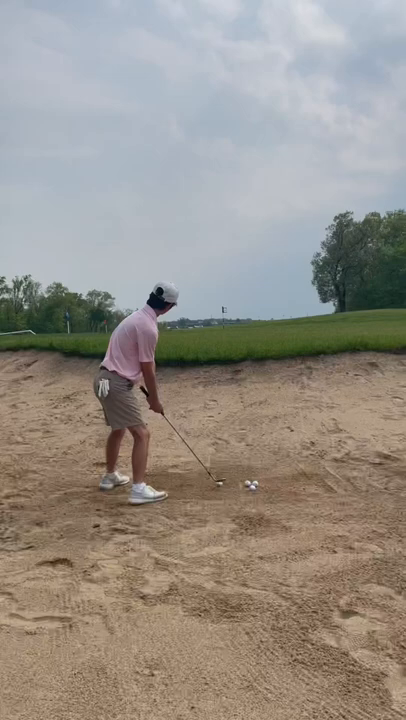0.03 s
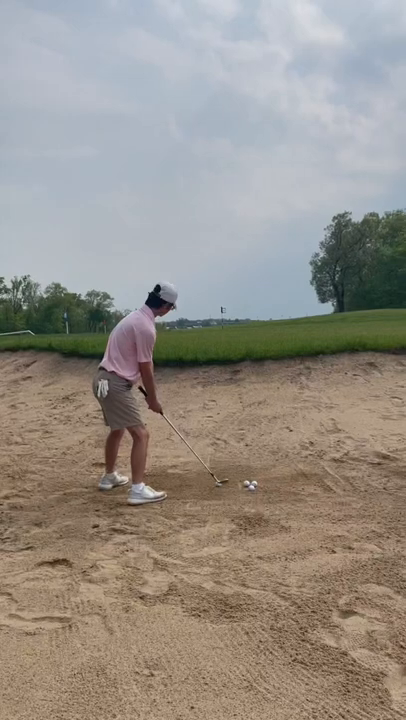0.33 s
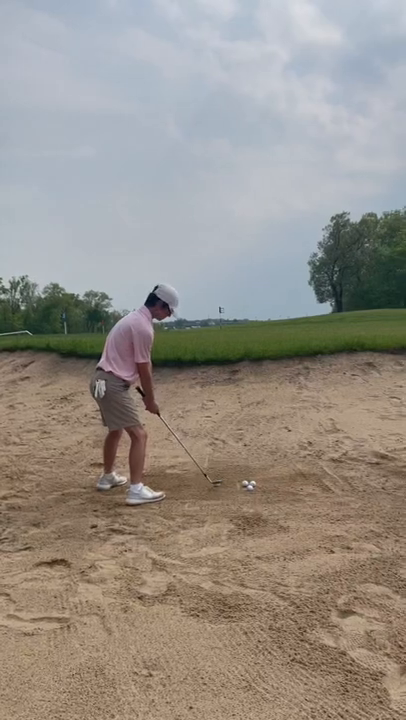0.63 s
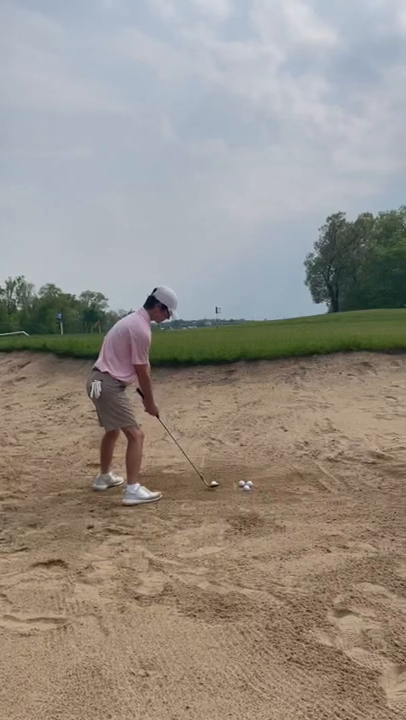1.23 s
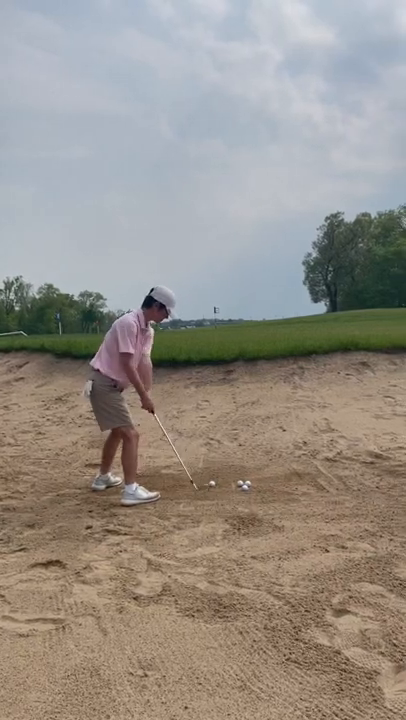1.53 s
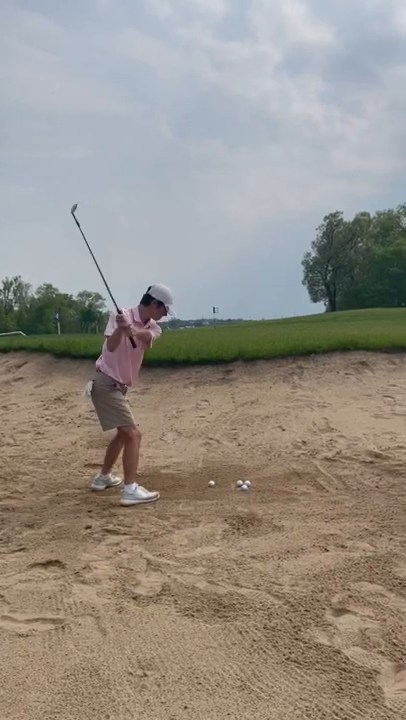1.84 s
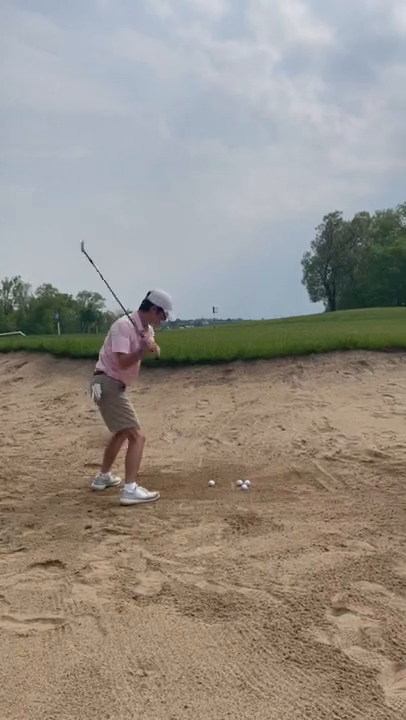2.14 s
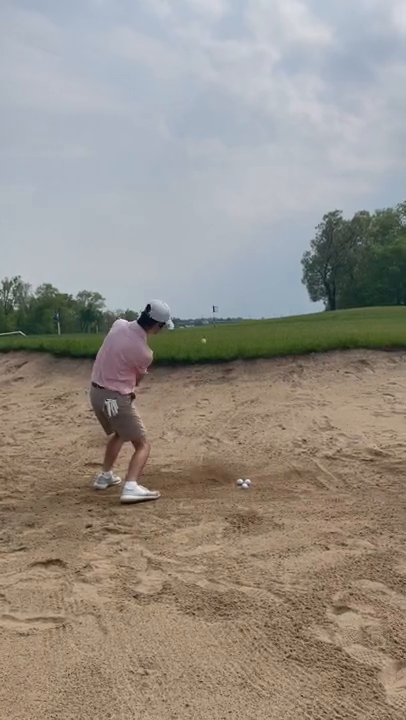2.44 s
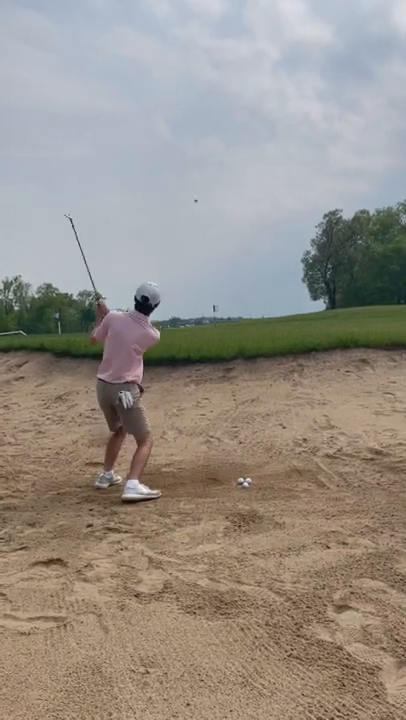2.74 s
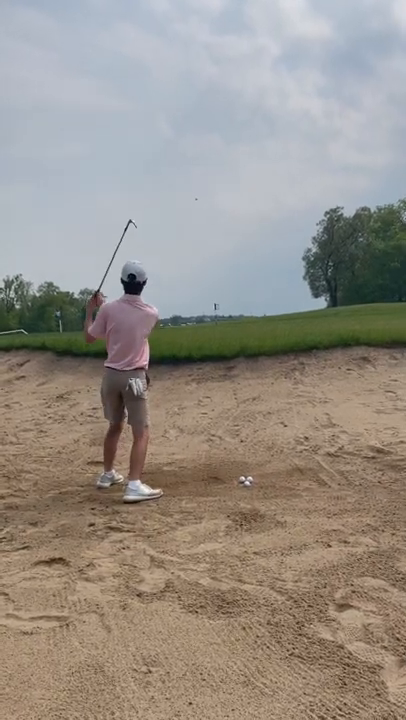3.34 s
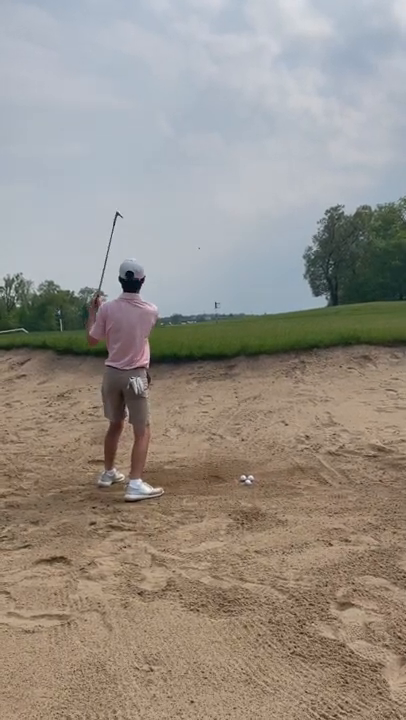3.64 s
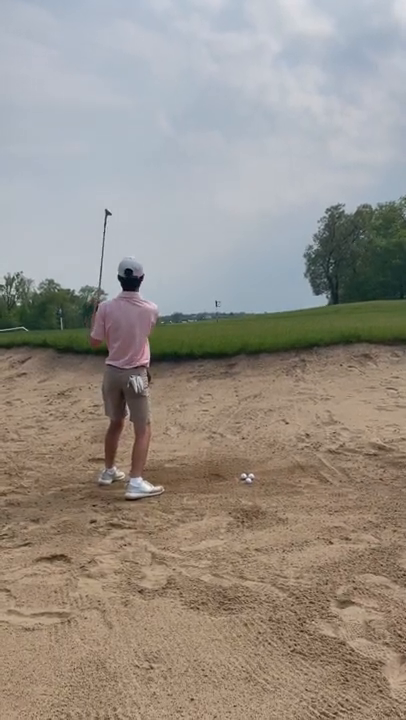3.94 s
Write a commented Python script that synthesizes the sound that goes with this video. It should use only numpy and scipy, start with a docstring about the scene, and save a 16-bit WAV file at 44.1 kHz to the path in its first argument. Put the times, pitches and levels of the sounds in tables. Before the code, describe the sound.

A golf club strikes a ball out of sand with one sharp clack, over low wind.

```python
"""Low wind rumble and airy hiss are heard first, with a distant engine and faint machinery hums.
Leaves rustle in a gust; then, a few metres away, a golfer hits a ball out of a sand bunker.
The impacts excite damped modes: the sand thuds, the club clacks on the ball and its face rings briefly.
Sand crunches, sprays and patters down as a multitude of tiny collisions.
Near the end a far bird chirps in short gliding whistles."""
import sys
import numpy as np
from scipy import signal
from scipy.fft import rfft, irfft
from scipy.io import wavfile
from scipy.ndimage import uniform_filter1d

SR = 44100
rng = np.random.default_rng(int(sys.argv[2]) if len(sys.argv) > 2 else 0)


def pcm_store(signal):
    """Save signal as 16-bit PCM."""
    levels = np.round(np.clip(np.atleast_2d(signal), -1, 1) * 32767)
    wavfile.write(sys.argv[1], SR, levels.astype(np.int16).T)


N = 176400

# Left-right coherence of outdoor noise, clipped to 0-1 in use: frequency_hz, coherence
NOISE_COHERENCE = [(60, 1), (150, 1.7), (290, 0.77), (640, 0), (1400, 0.8), (3100, .5), (7000, 0.25),
                   (15000, -2.5)]
# Phase lead of its left channel: frequency_hz, lead_rad
NOISE_LEAD = [(20, 0), (120, 0.05), (300, 0.35), (860, 0.96), (1500, 0.95), (2400, 2), (3600, 4), (6000, 5)]
# Its balance: frequency_hz, left_minus_right_db
NOISE_BALANCE = [(60, 0), (110, 0), (200, 1.5), (380, 2.5), (700, 6.5), (1290, 6.5), (2380, 0.5),
                 (4400, 1.5), (8120, -1.5), (15000, 0.5)]
# Spectrum of the wind rumble: frequency_hz, gain_db
RUMBLE_SPECTRUM = [(15, -38), (30, -19), (44, -11.5), (55, -1), (72, -1.5), (95, -1), (125, -2.5),
                   (160, -6), (230, -12.5), (290, -18.5), (380, -24.5), (600, -44), (1500, -83.5)]
# Envelope of the rumble: time_s, level_db
RUMBLE_ENVELOPE = [(0, -39.5), (.9, -39), (1.75, -38.5), (2.3, -39), (2.85, -40), (3.2, -39.5), (4, -37.5)]
# Spectrum of the airy hiss: frequency_hz, gain_db
HISS_SPECTRUM = [(100, -12.5), (300, -3.5), (480, -1), (620, 0.5), (880, 1.5), (1150, -4.5), (1550, -7.5),
                 (2000, -11.5), (2600, -16), (3600, -21), (5200, -30), (7000, -50), (11000, -50.5),
                 (16000, -58.5)]
# Envelope of the hiss: time_s, level_db
HISS_ENVELOPE = [(0, -50.5), (.4, -53.5), (1.5, -54), (2.3, -54), (3.2, -54), (4, -54)]
# Puffs of wind: peak_s, level_db
WIND_PUFFS = [(1.23, -39.5), (1.761, -36), (2.201, -42), (3.04, -38.5), (3.43, -39), (3.79, -40.5)]
# Spectrum of rustling leaves: frequency_hz, gain_db
LEAF_SPECTRUM = [(1500, -19.5), (3500, -3.5), (5200, 1), (7000, -17.5), (12000, -30.5)]

# Tones of far machinery: pitch_hz, level_db, peak_s, width_s, left_minus_right_db
MACHINE_TONES = [(84.7, -44, 0.82, 1.0, 1.5), (425.4, -67, 1.95, .85, 4.5), (481.7, -72, 1.5, 1.0, 4),
                 (546.2, -65.5, 1.9, 1.1, 5.5)]
# Running of the engine: time_s, firing_hz, gain_db, lift_above_second_harmonic_db
ENGINE_RUN = [(0, 57.35, -7.5, -3), (.3, 57.96, -4.5, -1), (.6, 59, 0.5, -2), (1.15, 60.4, -1, -1),
              (1.5, 61.2, -1, 5), (1.9, 62.04, 0, 3), (2.45, 61.98, -1.5, -4), (2.9, 60.6, -6, 1.5),
              (3.3, 58, -5, -3), (4, 57.43, -2.5, -5)]
# Its harmonics: harmonic_number, base_level_db
ENGINE_HARMONICS = [(1, -49), (2, -41.5), (3, -48.5), (4, -53), (5, -64.5)]
# Bird whistles: start_s, length_s, start_hz, end_hz, level_db
BIRD_CHIRPS = [(3.743, .028, 5450, 4700, -73), (3.771, 0.047, 3800, 2830, -68),
               (3.834, .025, 4450, 4700, -77.5), (3.883, .03, 2750, 3400, -73.5)]

# Sand crunching under the club: start_s, level_db, attack_s, t60_s, grains_per_s
CRUNCH_BURSTS = [(2.2830, -48, .0003, 0.009, 23000), (2.2856, -28, 0.00043, 0.0045, 31000),
                 (2.288, -53, .001, 0.028, 12000)]
# Spectrum of the crunch: frequency_hz, gain_db
CRUNCH_SPECTRUM = [(200, -16), (1500, 1), (3300, 4), (4500, -5), (6000, -2), (8000, -7), (9100, 1.5),
                   (11300, 0), (14000, -7), (15500, -1.5), (17000, -15)]
# Spectrum of the flying sand: frequency_hz, gain_db
SPRAY_SPECTRUM = [(500, -10), (3000, 3), (5500, 2), (7500, -8), (10000, -4), (12500, -8), (14000, -18),
                  (16000, -20)]
# Spectrum of the landing sand: frequency_hz, gain_db
PATTER_SPECTRUM = [(1000, -18.5), (5000, -7.5), (8000, -9), (9800, 2), (13000, -1), (14500, -7),
                   (15600, -1), (17000, -12)]
# Envelope of the landing sand: time_s, level_db
PATTER_ENVELOPE = [(2.75, -106), (2.86, -92), (2.97, -89), (3.0, -81.5), (3.145, -84), (3.175, -106)]
# Modes of the thud in the sand: pitch_hz, gain_db, t60_s
THUD_MODES = [(387, -13, 0.0068), (870, -1.5, 0.011), (1590, -4, 0.0068), (2335, -2.5, 0.0053)]
# Modes of club head and ball: pitch_hz, gain_db, t60_s, left_minus_right_db
CLACK_MODES = [(310, -14, .022, 3), (437, -12, 0.026, 4), (738, -12, 0.022, 10), (1093, -2.5, 0.0115, 7),
               (1346, 0, 0.011, 7.5), (1740, -18.5, 0.01, -3.5), (2220, -21, 0.012, 5)]
# Modes of the club face: pitch_hz, gain_db, t60_s, left_minus_right_db
RING_MODES = [(2520, -9, .008, 0), (3530, 0, .013, -3), (3760, -5, .01, 0), (5380, 2, .0048, 3),
              (7260, -3, .005, 2), (9200, -6, .003, 0)]
# Phase lead of the strike's left channel: frequency_hz, lead_rad
IMPACT_LEAD = [(300, 0), (1200, 0.5), (2200, 1.03), (3500, 4), (5400, 1.55), (7200, 2.5)]

TIME_S = np.arange(N) / SR
BIN_HZ = np.fft.rfftfreq(N, 1 / SR)


def amp(db):
    """Amplitude ratio: tenfold for every 20 decibels."""
    return 10 ** (np.asarray(db) / 20)


def unit_rms(x):
    """Normalisation to a mean power of one."""
    return x / np.sqrt(np.mean(x ** 2) + 1e-30)


def spectrum(points):
    """Interpolation of a table at every frequency bin, on a logarithmic frequency axis."""
    hz, value = np.transpose(points)
    return np.interp(np.log(BIN_HZ + 1), np.log(hz + 1), value)


def follow(points, column=1):
    """Linear interpolation of a time curve at every sample."""
    columns = np.transpose(points)
    return np.interp(TIME_S, columns[0], columns[column])


def pan(db):
    """Left and right gains: a level difference is a cue to direction."""
    return amp([db / 2, -db / 2]).reshape(2, -1)


def since(start_s):
    """Seconds elapsed since an onset, zero before it."""
    return np.maximum(TIME_S - start_s, 0)


def decay(t, t60_s):
    """Exponential damping: the level falls 60 dB in t60_s."""
    return np.exp(-np.log(1000) * t / t60_s)


def swell(peak_s, width_s):
    """Gaussian envelope with a peak of one."""
    return np.exp(-((TIME_S - peak_s) / width_s) ** 2)


def drift(rate_hz):
    """Random fluctuation of unit rms: low-pass filtered noise."""
    low_pass = np.exp(-(BIN_HZ / rate_hz) ** 2) * (BIN_HZ > 0)
    return unit_rms(irfft(rfft(rng.standard_normal(N)) * low_pass, N))


def tone(hz):
    """Sinusoid of unit peak whose phase is the integral of its changing frequency."""
    return np.sin(2 * np.pi * np.cumsum(hz) / SR)


def scattered(x, echo_db, t60_s):
    """Diffuse reflection from sand banks or trees: convolution adds a decaying noise tail."""
    t = np.arange(SR // 2) / SR
    tail = rng.standard_normal((2, len(t))) * np.minimum(t / .0025, 1) * decay(t, t60_s)
    tail /= np.linalg.norm(tail, axis=1, keepdims=True)
    return x + amp(echo_db) * signal.fftconvolve(np.atleast_2d(x), tail, axes=1)[:, :N]


def outdoor_noise(colour):
    """Partial coherence: noise reaches two nearby points alike in part, differing in phase and level."""
    left, independent = rfft(rng.standard_normal((2, N)))
    coherence = np.clip(spectrum(NOISE_COHERENCE), 0, 1)
    right = coherence * left + np.sqrt(1 - coherence ** 2) * independent
    pair = np.array([left, right * np.exp(-1j * spectrum(NOISE_LEAD))])
    return unit_rms(irfft(pair * pan(spectrum(NOISE_BALANCE)) * amp(spectrum(colour)), N))


def treble_flicker(x, treble_depth_db):
    """Random gain modulation in time and frequency adds a faint watery flicker, mostly to the treble."""
    hz, _, cells = signal.stft(x, SR, nperseg=1024, noverlap=768)
    flicker = uniform_filter1d(rng.standard_normal(cells.shape[1:]), size=5, axis=0)
    flicker = unit_rms(uniform_filter1d(flicker, size=6, axis=1))
    depth_db = treble_depth_db * np.clip(hz / 3000, .3, 1)[:, None]
    _, modulated = signal.istft(cells * amp(depth_db * flicker), SR, nperseg=1024, noverlap=768)
    return unit_rms(modulated[:, :N])


def wind_and_hiss(lumps_db=.8, waver_db=.5):
    """Filtered noise: lumpy low wind rumble under airy hiss, with a faint flicker added to the treble."""
    rumble_gain = amp(follow(RUMBLE_ENVELOPE) + lumps_db * drift(11))
    hiss_gain = amp(follow(HISS_ENVELOPE) + waver_db * drift(8.4))
    hiss = treble_flicker(outdoor_noise(HISS_SPECTRUM), treble_depth_db=1.7)
    return rumble_gain * outdoor_noise(RUMBLE_SPECTRUM) + hiss_gain * hiss


def puffs(pitch_hz=56, waver=.08):
    """Pressure fluctuations of passing eddies make brief, soft booms."""
    envelope = sum(amp(db) * swell(peak_s, width_s=.06) for peak_s, db in WIND_PUFFS)
    return envelope * np.sqrt(2) * tone(pitch_hz * (1 + waver * drift(8)))


def leaves(level_db=-79.5):
    """Amplitude-modulated noise: far leaves rustle as one gentle gust rises and falls."""
    return amp(level_db) * swell(peak_s=1.45, width_s=.25) * outdoor_noise(LEAF_SPECTRUM)


def machinery(waver=.005, flutter_db=2.5):
    """Distant machines hum in tones that swell and recede, with random pitch and level modulation."""
    hums = np.zeros((2, N))
    for hz, db, peak_s, width_s, side_db in MACHINE_TONES:
        hum = np.sqrt(2) * tone(hz * (1 + waver * drift(8)))
        envelope = 1 / np.sqrt(1 + ((TIME_S - peak_s) / width_s) ** 4)
        hums += pan(side_db) * amp(db + flutter_db * drift(5)) * envelope * hum
    return hums


def engine(waver=.016, flutter_db=3, throb_hz=5.7, throb_peak_s=2.275, throb_depth_db=4.5):
    """Periodic firing gives a harmonic series; the air makes each partial flutter; the drone throbs."""
    cycles = np.cumsum(follow(ENGINE_RUN) * (1 + waver * drift(5.67))) / SR
    gain_db, lift_db = follow(ENGINE_RUN, column=2), follow(ENGINE_RUN, column=3)
    drone = np.zeros(N)
    for harmonic, db in ENGINE_HARMONICS:
        partial_db = db + (harmonic > 2) * lift_db + flutter_db * drift(7)
        drone += amp(partial_db) * np.sqrt(2) * np.sin(2 * np.pi * (harmonic * cycles + rng.random()))
    pulsation = np.cos(2 * np.pi * throb_hz * (TIME_S - throb_peak_s)) - .5
    throb_db = throb_depth_db * swell(throb_peak_s, width_s=.55) * pulsation
    return pan(db=.7) * amp(gain_db + throb_db) * drone


def bird(warble=.02, ease=1.8):
    """Frequency-modulated whistles: each glide starts fast and levels off."""
    song = np.zeros(N)
    for start_s, length_s, start_hz, end_hz, db in BIRD_CHIRPS:
        progress = np.minimum(since(start_s) / length_s, 1)
        glide_hz = end_hz + (start_hz - end_hz) * (1 - progress) ** ease
        song += amp(db) * np.sin(np.pi * progress) * tone(glide_hz * (1 + warble * drift(150)))
    return song


def grains(per_s, colour):
    """Shot noise: independent grain collisions make a stream of tiny filtered clicks."""
    clicks = rng.standard_normal((2, N)) * (rng.random((2, N)) < per_s / SR)
    return unit_rms(irfft(rfft(clicks) * amp(spectrum(colour)), N))


def burst(start_s, db, attack_s, t60_s, per_s, colour):
    """A transient of grain noise with a linear attack and an exponential decay."""
    t = since(start_s)
    return amp(db) * np.minimum(t / attack_s, 1) * decay(t, t60_s) * grains(per_s, colour)


def sand(patter_per_s=1300):
    """Granular collisions: sand crunches under the club, sprays, ticks once and patters down."""
    crunch = sum(burst(*row, CRUNCH_SPECTRUM) for row in CRUNCH_BURSTS)
    spray = burst(start_s=2.29, db=-69, attack_s=.005, t60_s=.33, per_s=2000, colour=SPRAY_SPECTRUM)
    tick = burst(start_s=2.503, db=-74.5, attack_s=1 / SR, t60_s=.01,
                 per_s=patter_per_s, colour=PATTER_SPECTRUM)
    patter = amp(follow(PATTER_ENVELOPE)) * grains(patter_per_s, PATTER_SPECTRUM)
    return crunch + spray + tick + patter


def ringing(modes, start_s, rise_s):
    """Modal superposition: damped sinusoids build up during contact, neighbours in opposite phase."""
    t = since(start_s)
    rise = np.sin(np.pi / 2 * np.minimum(t / rise_s, 1)) ** 2
    return rise * sum((-1) ** k * pan(side_db) * amp(db) * decay(t, t60_s) * np.sin(2 * np.pi * hz * t)
                      for k, (hz, db, t60_s, side_db) in enumerate(modes))


def strike(thud_side_db=7):
    """Impact excitation: the sole thuds into sand, the face clacks on the ball and rings as it leaves."""
    thud_modes = [(*row, thud_side_db) for row in THUD_MODES]
    thud = amp(-24) * ringing(thud_modes, start_s=2.2828, rise_s=.00012)
    clack = amp(-17) * ringing(CLACK_MODES, start_s=2.2855, rise_s=.00075)
    ring = amp(-24.5) * ringing(RING_MODES, start_s=2.2862, rise_s=.00091)
    left, right = -(thud + clack + ring)
    lag = np.exp(-1j * spectrum(IMPACT_LEAD))
    return np.array([left, irfft(rfft(right) * lag, N)])


def scene():
    """Superposition: the sounds of the course, the bird and the bunker shot add as pressures."""
    background = wind_and_hiss() + puffs() + leaves() + machinery() + engine()
    birdsong = scattered(bird(), echo_db=1.5, t60_s=.35)
    shot = scattered(strike() + sand(), echo_db=-19, t60_s=.022)
    return background + birdsong + shot


def record(dry, silence_s=.036, cutoff_hz=16450):
    """Gating and band-limiting: a moment of silence, a brief fade at each end and a steep low-pass."""
    fade_in = np.minimum(since(silence_s) / .0005, 1)
    fade_out = np.minimum(TIME_S[::-1] / .004, 1)
    low_pass = signal.ellip(10, .1, 90, cutoff_hz, fs=SR, output="sos")
    return signal.sosfilt(low_pass, dry * fade_in * fade_out, axis=1)


dry = scene()
out = record(dry)
pcm_store(out)
```